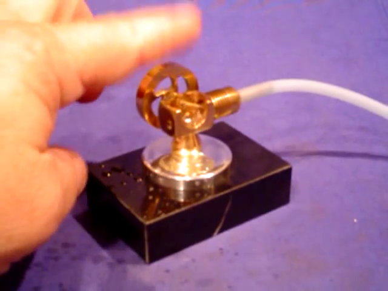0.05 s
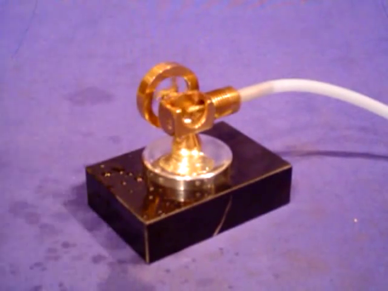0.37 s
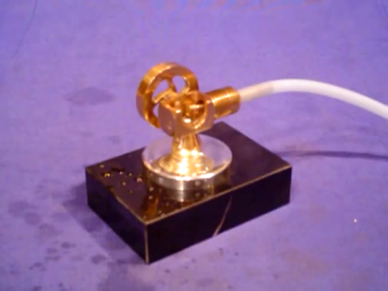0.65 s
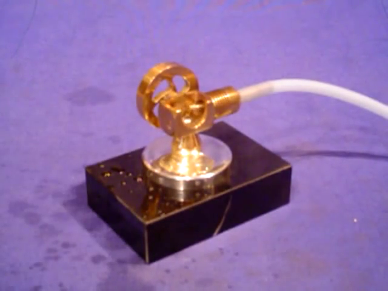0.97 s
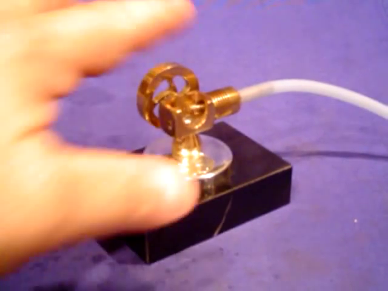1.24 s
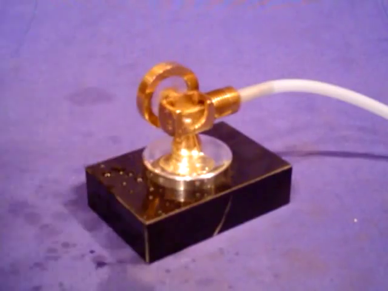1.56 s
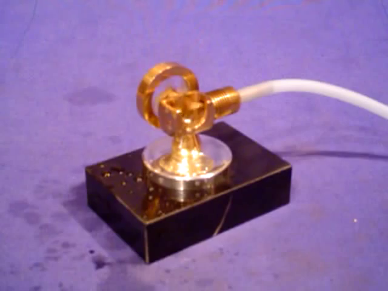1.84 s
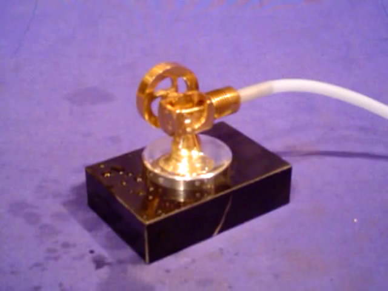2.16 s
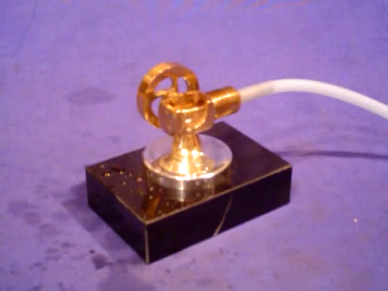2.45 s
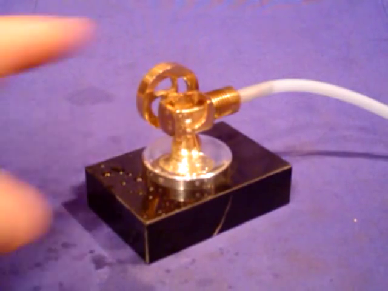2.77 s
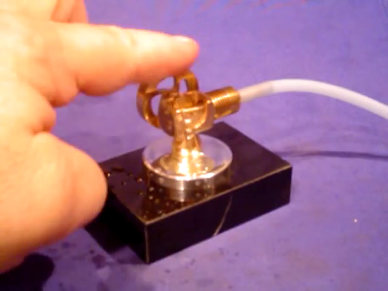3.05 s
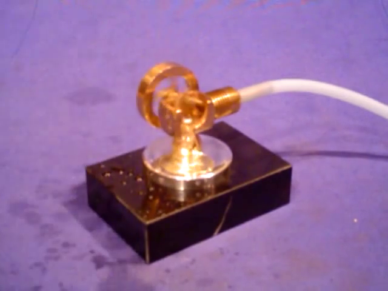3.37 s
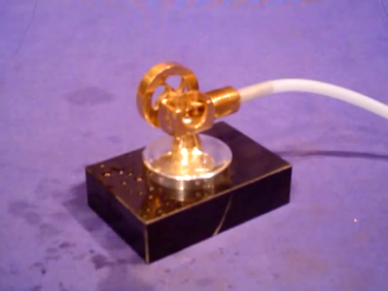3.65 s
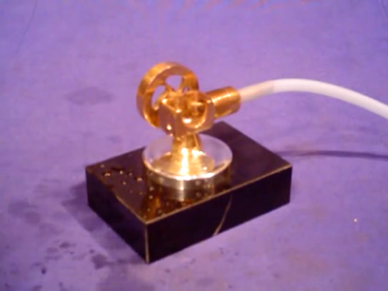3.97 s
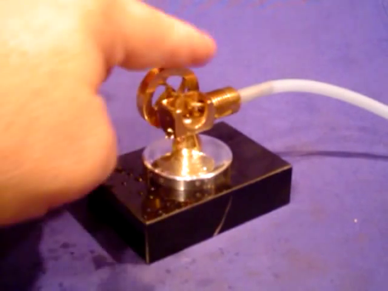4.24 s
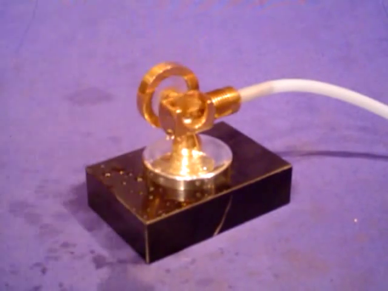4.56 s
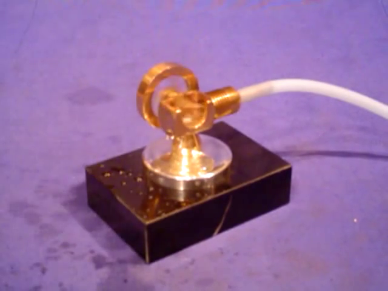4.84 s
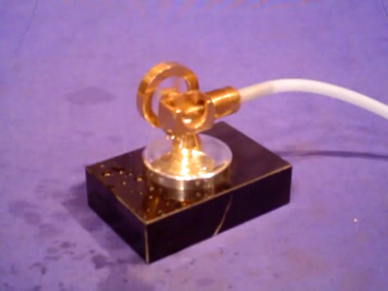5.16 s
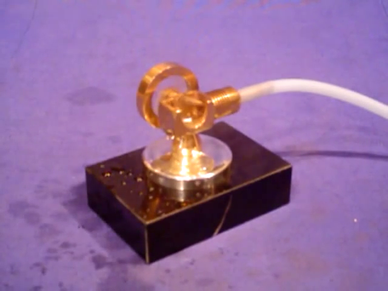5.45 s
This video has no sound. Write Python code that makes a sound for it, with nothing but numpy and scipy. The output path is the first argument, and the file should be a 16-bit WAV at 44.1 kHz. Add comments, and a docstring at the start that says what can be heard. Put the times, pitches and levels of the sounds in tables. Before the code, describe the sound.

Close up in a small room, a tiny steam engine on a table leaks a high, sizzling hiss. It chuffs weakly and irregularly while droplets snap, then pauses with a faint gurgle. A few loud chuffs blow on the microphone and give way to a second of steady hissing. Finally the engine catches, its crisp exhaust puffs coming quicker and quicker.

```python
"""A miniature brass steam engine on a table in a small room, the microphone close by.
From the start wet steam leaks past the cylinder face; a finger flicks the flywheel, the exhaust port
opens in short chuffs and condensate spits. The chuffs stop and water gurgles in the feed tube. Near 3 s
loud chuffs blow on the microphone, then the wheel stalls with the port ajar, hissing for a second.
At last the engine turns freely, and its final beats come quicker and quicker."""
import sys
import numpy as np
from scipy import signal
from scipy.fft import rfft, irfft
from scipy.io import wavfile

SR = 44100
rng = np.random.default_rng(int(sys.argv[2]) if len(sys.argv) > 2 else 0)


def dump(signal):
    """Clip the signal to [-1, 1] and save it as 16-bit WAV at the path in sys.argv[1]."""
    limited = np.clip(np.atleast_2d(signal).T, -1, 1)
    pcm = np.round(limited * 32767).astype(np.int16)
    wavfile.write(sys.argv[1], SR, pcm)


N = 242793
T = np.arange(N) / SR

# exhaust beats of the freely turning engine: peak_s, closing_s, level_db, spray_relative_db
BEATS = [(4.568, .013, -13.5, -19), (4.629, .012, -12.3, -23), (4.707, .021, -14, -25),
         (4.938, .039, -11.3, -19.5), (5.183, .036, -11.3, -19.5), (5.363, .031, -12.7, -19),
         (5.498, .02, -12, -20)]
# the finger knocks the base against the table: start_s, level_db, pitch_hz
KNOCKS = [(.226, -38, 183), (1.528, -30, 183), (1.726, -38, 239), (3.173, -31, 165), (4.527, -31, 180)]
# spectrum of sputtering condensate: frequency_hz, level_db
SPUTTER_COLOUR = [(60, -20.5), (140, -15.5), (220, -4), (400, -5), (600, 1), (830, -3), (1050, .5),
                  (1600, -1.3), (2000, 0), (2600, -1.5), (3300, -5.5), (4500, -8), (7000, -29.5)]
PORT_OPEN_S, PORT_CLOSE_S = .0065, .009  # a single chuff adds a share of its hold to each


def port_openings():
    """Every opening of the port: open_s, opening_s, hold_s, closing_s, level_db, spray_relative_db."""
    # single chuffs: open_s, hold_s, level_db, spray_relative_db
    chuffs = [(.252, .006, -23, -8), (.35, .018, -25.5, -12), (.568, .015, -33, -7), (.846, .04, -32, -8),
              (1.052, .018, -29, -10), (1.142, .016, -29.5, -9), (1.284, .011, -25, -15),
              (1.37, .022, -28.3, -15), (1.482, .018, -23.7, -18), (1.571, .008, -27, -6),
              (1.631, .016, -27, -7), (1.707, .001, -21.5, -18), (1.793, .024, -28.5, -10),
              (1.921, .07, -28.5, -10), (3.18, .008, -9, -15), (3.243, .021, -13.7, -14),
              (3.41, .055, -14.5, -13), (4.397, .018, -23, -7), (4.503, .01, -20, -22)]
    single = [(s, PORT_OPEN_S + .17 * hold, hold, PORT_CLOSE_S + .5 * hold, db, wet)
              for s, hold, db, wet in chuffs]
    return single + [(s, .7 * fall, 0, fall, db, wet) for s, fall, db, wet in BEATS]


def exhaust(afterpuff_db=-11.5, spray_linger_s=.006):
    """Each opening of the port throws out its water first, then a fluttering chuff of steam."""
    # spectrum of a chuff: frequency_hz, level_db
    chuff_colour = [(300, -34.5), (1000, -25), (2500, -17.5), (3500, -30), (4000, -13), (4400, -7.5),
                    (5000, -3.5), (5500, 0), (5900, -2), (6600, -2), (7300, -3.5), (8000, -13.5),
                    (8700, -9.5), (9600, -9)]
    puffs, splashes = [], []
    for s, rise, hold, fall, db, wet in port_openings():
        puffs.append(undb(db) * swell(s, rise, fall, hold))
        lead_s = 1.35 * (rise - PORT_OPEN_S)  # the slower the port opens, the further water leads
        splashes.append(undb(db + wet) * swell(s - lead_s, .55 * rise, fall + spray_linger_s, hold / 2))
    for s, fall, db, _ in BEATS:  # a weaker puff trails each beat
        puffs.append(undb(db + afterpuff_db) * swell(s + 1.65 * fall, .55 * fall, .55 * fall))
    chuff = together(puffs) * steam(chuff_colour, undb(3 * np.tanh(walk(1100))), grain_db=.8)
    spray = together(splashes) * steam(SPUTTER_COLOUR, undb(2 * np.tanh(walk(500))), grain_db=3)
    return undb(1.5) * chuff + undb(.6) * spray


def leak(stall_edge_s=.018):
    """A hissing jet, a fine sizzle and sputtering condensate, all choked by one trembling water film."""
    # steam seeping at the port face: time_s, jet_db, sizzle_relative_db, sputter_relative_db
    seepage = [(0.0, -33.7, -7, -3.5), (.18, -34, -7, -5.5), (.31, -38, -4, -4.5), (.45, -38, -3, -2.5),
               (.54, -33.5, -8.5, -3.5), (.95, -34.5, -7.5, -7.5), (1.42, -30.3, -5.5, -7.5),
               (1.58, -37, 0, 0), (1.86, -38, -3.5, -2.5), (2.08, -38, -4, -6.5), (2.25, -38.5, -4.5, -6),
               (2.36, -32.7, -3, -7), (2.75, -29.7, -3, -1.5), (3.07, -28.5, -3, -3.5),
               (3.3, -33, -3.5, -10), (4.65, -35, -1.5, -4), (4.83, -32, -5.5, -11), (5.12, -31.5, -6, -9),
               (5.45, -37, -6, -4)]
    # the wheel rests, port ajar: start_s, length_s, jet_db, sizzle_relative_db, sputter_relative_db
    stalls = [(3.045, .068, -24.5, .5, -5.5), (3.49, 1.02, -22.5, -7, -12.8), (4.29, .09, -35, 8.5, -15)]
    # spectra of the jet and the sizzle: frequency_hz, level_db
    jet_colour = [(2500, -36.5), (3500, -18.5), (4200, -8), (4800, -6), (5500, -1.5), (6500, -1),
                  (7400, -2.5), (8000, -7.5), (8800, -20), (10000, -37)]
    sizzle_colour = [(6000, -29.5), (7400, -16), (8000, 0), (8700, -1.5), (9500, 6.5), (10200, -6.5)]
    times, *columns = np.transpose(seepage)
    seep_db, sizzle_db, sputter_db = (np.interp(T, times, column) for column in columns)
    seep = undb(seep_db) * leak_gap()
    ajar = [(undb(db) * swell(s, stall_edge_s, stall_edge_s, length), fine, wet)
            for s, length, db, fine, wet in stalls]
    jet_flow = together([seep] + [flow for flow, _, _ in ajar])
    sizzle_flow = together([seep * undb(sizzle_db)] + [flow * undb(fine) for flow, fine, _ in ajar])
    water_flow = together([undb(seep_db + sputter_db)] + [flow * undb(wet) for flow, _, wet in ajar])
    film = undb(1.2 * walk(600) + .8 * walk(70))
    jet = jet_flow * steam(jet_colour, film * undb(.9 * walk(110)), grain_db=2)
    sizzle = sizzle_flow * steam(sizzle_colour, film, grain_db=2.5)
    sputter = water_flow * steam(SPUTTER_COLOUR, film * undb(.8 * walk(120)), grain_db=3.5)
    return undb(.44) * jet + undb(2.84) * sizzle + undb(-.9) * sputter


def leak_gap(cover_lead_s=.007, pinch_lag_s=.011):
    """Share of the leak left open: the port is covered before it opens; knocks seat the cylinder."""
    covered = [.65 * swell(s - rise - cover_lead_s, .008, .008) for s, rise, *_ in port_openings()]
    pinched = [.8 * swell(s + pinch_lag_s, .014, .014) for s, *_ in KNOCKS]
    return np.prod(1 - np.minimum(covered + pinched, .95), axis=0)


def steam(colour, flutter, grain_db):
    """Turbulence made of tiny bursts of uneven size, throttled by water in the gap."""
    bursts = rng.standard_normal(N) * undb(grain_db * np.minimum(walk(5000), 3))
    return unit(convolve(bursts * flutter, response(colour)))


def spits(spatter_s=.0013):
    """A bursting drop gives a sharp snap with a lower body and a few milliseconds of spatter."""
    # drops of condensate at the port: start_s, level_db, body_relative_db
    drops = [(.2505, -6, -16), (.256, -6, -8), (.2604, -9, -8), (.3574, -7, -9), (1.030, -11, 0),
             (1.256, -16, 0), (1.339, -5.5, -10), (1.468, -12.5, 1), (1.577, -9.5, -1), (1.638, -12.5, -2),
             (1.708, 1.5, -23), (1.928, -8, 2), (3.407, -8, -6), (3.544, -6, -14), (3.597, -9, -17),
             (4.047, -6, -14), (4.560, -11, 2)]
    # spectrum of the snap: frequency_hz, level_db
    snap_colour = [(500, -27), (3000, -16), (4500, -5), (5900, 0), (7000, 1), (8200, -10), (10000, -15)]
    out = np.zeros(N)
    snap, body = response(snap_colour), response(SPUTTER_COLOUR)
    age = T[:len(snap)]
    for s, db, body_db in drops:
        burst = .072 * rng.standard_normal(len(age)) * np.exp(-age / spatter_s)
        burst[0] = 1
        pop = np.convolve(burst, snap + undb(body_db) * body)
        start = int(s * SR)
        out[start:start + len(pop)] += undb(db) * pop / np.abs(pop).max()
    return out


def knocks(contact_s=.004, t60_s=.1):
    """Soft thuds of the base on the table, with a lower rocking mode."""
    out = np.zeros(N)
    for s, db, hz in KNOCKS:
        age = np.maximum(T - s, 0)
        modes = np.sin(2 * np.pi * hz * age) + .6 * np.sin(2 * np.pi * .74 * hz * age)
        out += undb(db) * modes * (1 - np.exp(-age / contact_s)) * np.exp(-np.log(1000) * age / t60_s)
    return out


def slugs():
    """Slugs of water gargle through tube and cylinder, each briefly stirring a throaty resonance."""
    # passing slugs: peak_s, level_db, half_length_s, pitch_hz, width_hz
    passages = [(.62, -45, .16, 522, 22), (1.19, -47, .025, 390, 90), (1.66, -46, .2, 522, 26),
                (2.275, -47, .02, 420, 90), (3.07, -33.5, .05, 950, 300), (4.42, -41, .04, 1050, 300),
                (4.775, -42, .018, 650, 400)]
    return sum(undb(db) * swell(s, half, half) * resonance(hz, width)
               for s, db, half, hz, width in passages)


def feed_tube(count=700, low_hz=185, high_hz=430, cycles=7, rise=.12, simmer_db=-63, ring_db=-54):
    """Small bubbles, each rising in pitch as it dies, and a hollow ring stirred by the flow."""
    # water gurgling in the tube: peak_s, level_db, half_length_s
    gurgles = [(1.22, -56, .1), (1.65, -48.5, .16), (2.61, -48, .18), (3.3, -57, .15), (4.5, -59, .12)]
    bubbling = together([undb(simmer_db)] + [undb(db) * swell(s, half, half) for s, db, half in gurgles])
    bubbles, age = np.zeros(N + 4096), T[:4096]
    for when, pitch, size in rng.random((count, 3)):
        turns = age * low_hz * (high_hz / low_hz) ** pitch
        life = turns / cycles
        phase = 2 * np.pi * turns * (1 + rise * life / 2)
        start = int(when * N)
        bubbles[start:start + len(age)] += size * np.sin(phase) * np.exp(-2 * life)
    return bubbling * unit(bubbles[:N]) + undb(ring_db) * resonance(hz=522, width_hz=32)


def gusts():
    """Slow pushes of air on the microphone, whose diaphragm swings back after each."""
    # steam gusts that reach the microphone: peak_s, level_db
    arrivals = [(3.186, -27), (3.262, -34), (3.425, -41), (4.575, -37.5), (4.63, -35), (4.705, -35)]
    push = sum(undb(db) * swell(s, .008, .02) for s, db in arrivals) * (1 + .3 * walk(130))
    return signal.sosfilt(signal.butter(1, 4, "high", fs=SR, output="sos"), push)


def reflections(x, table_s=.00197, table_db=-14, wall_db=-17, t60_s=.18):
    """The table top reflects at once and combs the hiss; the walls add a short faint tail."""
    age = T[:SR // 2]
    tail = rng.standard_normal(len(age)) * np.exp(-np.log(1000) * age / t60_s) * (age > .005)
    table_echo = np.interp(T - table_s, T, x)
    return x + undb(table_db) * table_echo + undb(wall_db) * convolve(x, tail / np.linalg.norm(tail))


def room_tone(level_db=-52):
    """Low steady noise behind the engine, with two droning resonances."""
    # spectrum of the room tone: frequency_hz, level_db
    room_colour = [(20, -1), (50, -6), (100, -9.5), (200, -6), (450, -3), (800, -7), (2000, -15),
                   (3500, -14), (10000, -26.5)]
    # hum-like resonances: pitch_hz, width_hz, level_db
    drones = [(500, 120, -59), (1050, 65, -54)]
    noise = undb(level_db) * unit(convolve(rng.standard_normal(N), response(room_colour, size=4096)))
    return noise + sum(undb(db + 1.5 * walk(4)) * resonance(hz, width) for hz, width, db in drones)


def undb(db):
    """Decibels to gain."""
    return 10 ** (np.asarray(db) / 20)


def unit(x):
    """Scale to rms 1."""
    return x / np.sqrt(np.mean(x ** 2))


def response(colour, size=1024):
    """Causal impulse response of unit energy from rows of frequency_hz, level_db."""
    hz, db = np.transpose(colour)
    grid_hz = np.maximum(np.fft.rfftfreq(size, 1 / SR), 1)
    gain = undb(np.interp(np.log(grid_hz), np.log(hz), db))
    cepstrum = irfft(np.log(gain))
    cepstrum[1:size // 2] *= 2  # fold onto positive time for minimum phase
    cepstrum[size // 2 + 1:] = 0
    impulse = irfft(np.exp(rfft(cepstrum)))
    return impulse / np.linalg.norm(impulse)


def convolve(x, impulse):
    """Pass x through an impulse response."""
    return signal.fftconvolve(x, impulse)[:N]


def walk(rate_hz):
    """Smooth random wander with spread 1."""
    knots = rng.standard_normal(N)
    return unit(np.interp(T * rate_hz, np.arange(N), knots))


def swell(peak_s, opening_s, closing_s, hold_s=0):
    """Smooth rise of a flow to its peak, a hold, and a smooth fall."""
    offset = T - peak_s
    offset -= np.clip(offset, 0, max(hold_s, 0))
    width = np.maximum(np.where(offset < 0, opening_s, closing_s), .002)
    return np.exp(-(offset / width) ** 2)


def resonance(hz, width_hz):
    """Noise ringing in one narrow resonance, rms 1."""
    return unit(signal.lfilter(*signal.iirpeak(hz, hz / width_hz, fs=SR), rng.standard_normal(N)))


def together(flows):
    """Unrelated flows add in power."""
    return np.sqrt(sum(flow ** 2 for flow in flows))


def scene():
    """The engine on its table, heard in mono from close by."""
    engine = reflections(leak() + exhaust() + spits() + knocks())
    return (engine + feed_tube() + slugs() + gusts() + room_tone())[None]


def record(dry, top_hz=10050, ceiling=.88):
    """A small camera's microphone keeps only the band below its cut-off and rounds the highest peaks."""
    lowpass = signal.ellip(12, .2, 85, top_hz, fs=SR, output="sos")
    heard = signal.sosfilt(lowpass, dry)
    rounded = heard / (1 + (heard / ceiling) ** 4) ** .25
    return signal.sosfiltfilt(lowpass, rounded)


dry = scene()
out = record(dry)
dump(out)
```